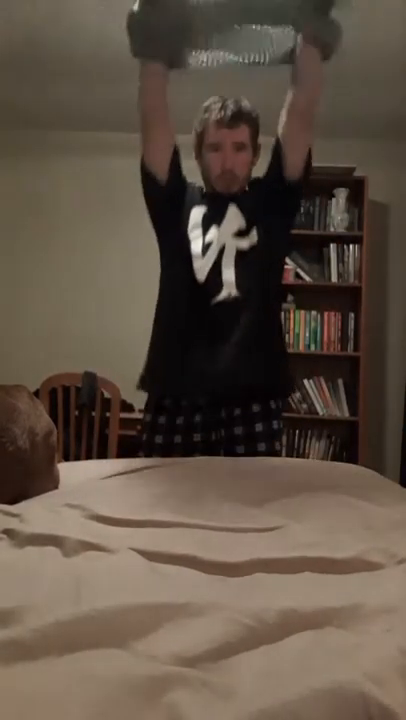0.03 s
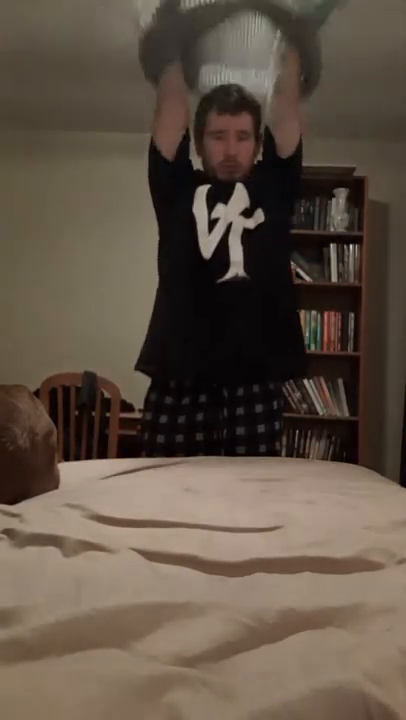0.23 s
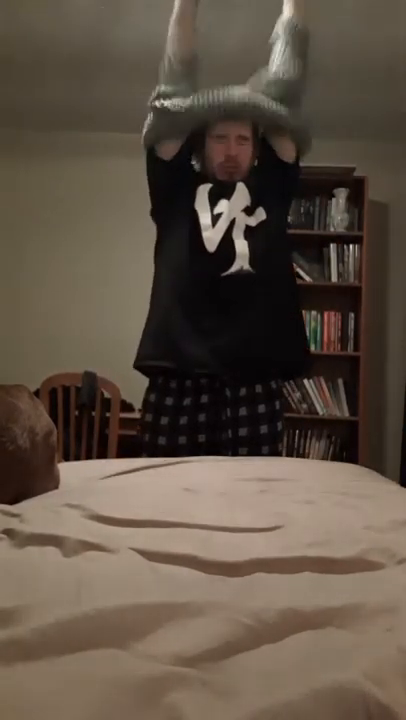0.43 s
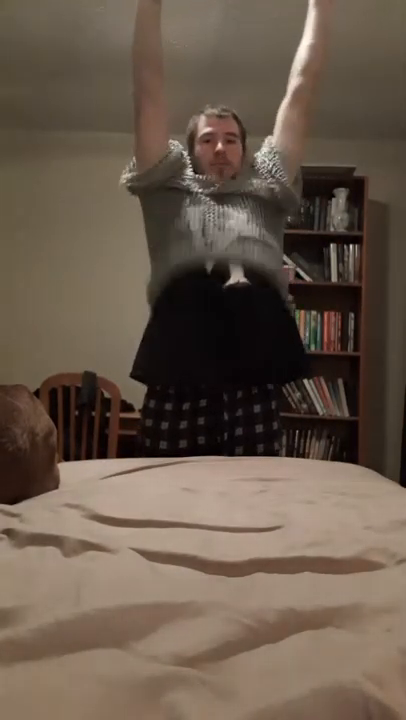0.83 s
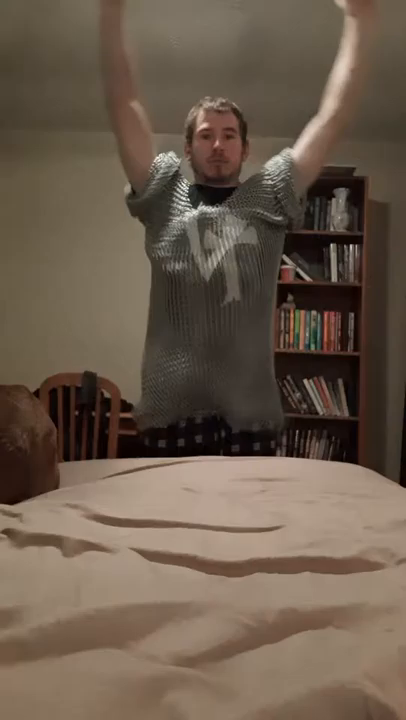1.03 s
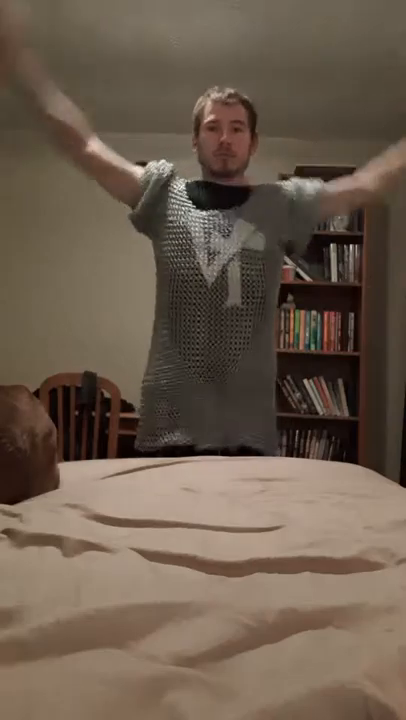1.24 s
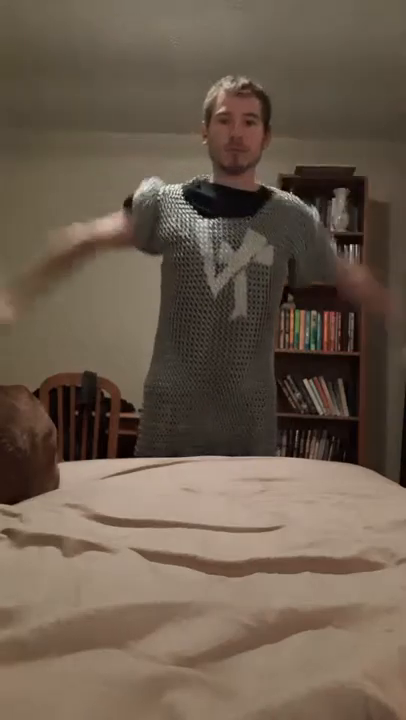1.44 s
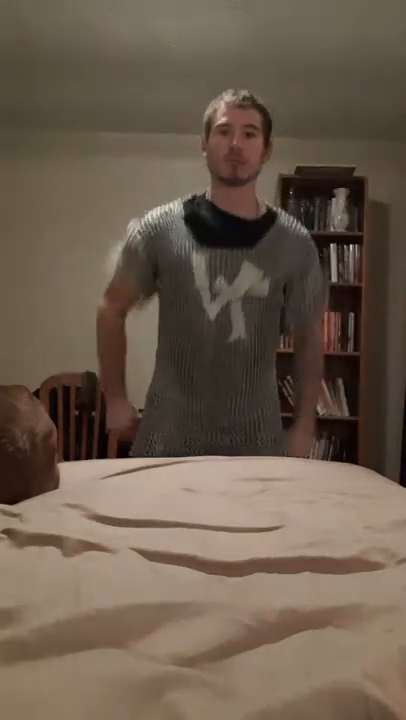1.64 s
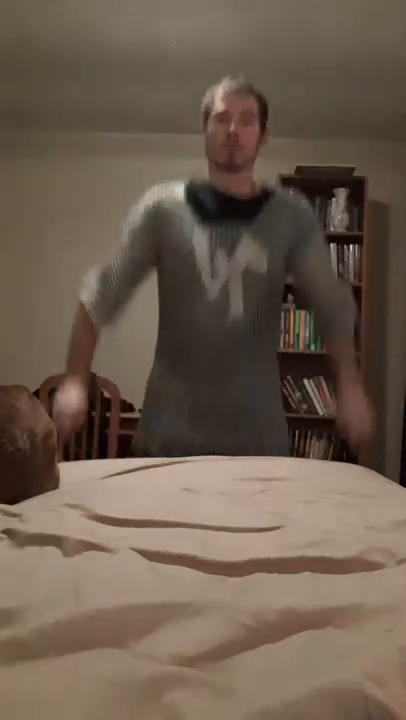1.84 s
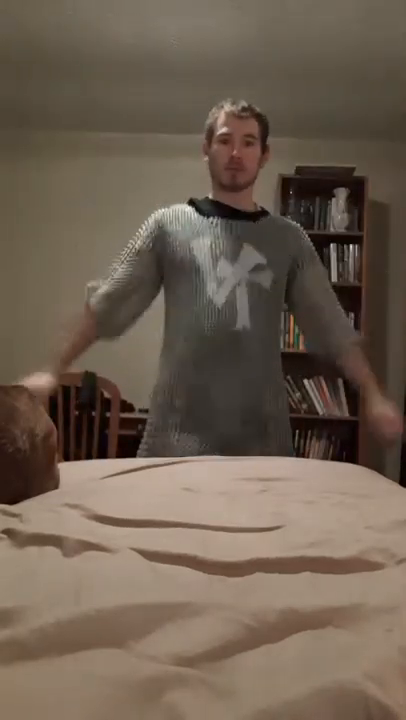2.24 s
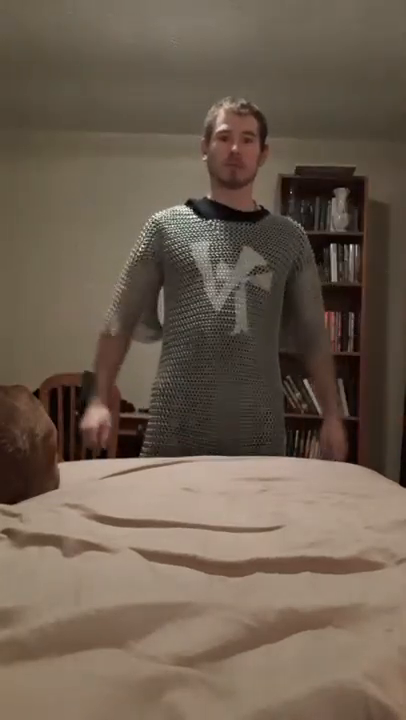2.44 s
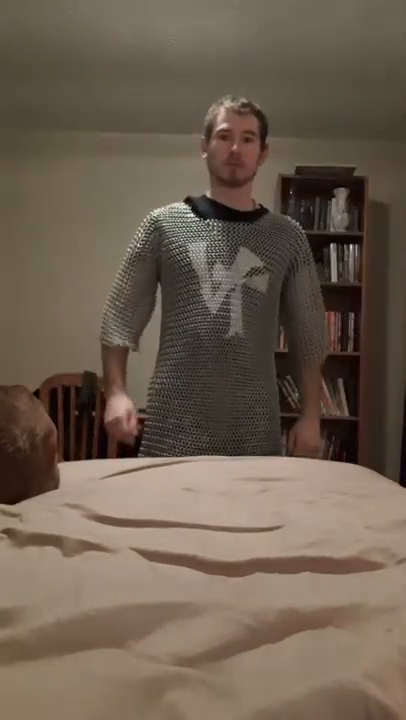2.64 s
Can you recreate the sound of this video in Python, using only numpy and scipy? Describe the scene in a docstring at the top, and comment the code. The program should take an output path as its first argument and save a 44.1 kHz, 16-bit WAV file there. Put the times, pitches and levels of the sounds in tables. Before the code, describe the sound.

Chainmail clicks and jingles, brighter on the left, as someone pulls it on in a bedroom. After a short lull and another rustle, one jump lands with a low thud and a metallic crunch, over a steady fan drone.

```python
"""A fan drones in the low modes of a bedroom while faint steel clicks swell into a jingle:
a chainmail shirt slides down over raised arms, swings, and is settled with one jump.
Thousands of small links click, scrape and ring; the mail drags over a cotton shirt
and slaps down as the feet land. The right microphone port is shaded from the treble."""
import sys
import numpy as np
from scipy import signal
from scipy.fft import rfft, irfft, next_fast_len
from scipy.io import wavfile
from scipy.ndimage import map_coordinates

SR = 44100
rng = np.random.default_rng(int(sys.argv[2]) if len(sys.argv) > 2 else 0)


def store_wav(level_fs):
    """Save 16-bit WAV to argv[1]."""
    pcm = np.round(np.clip(np.atleast_2d(level_fs), -1, 1) * 32767)
    wavfile.write(sys.argv[1], SR, pcm.T.astype(np.int16))


N = 119070


def amp(db):
    return 10 ** (np.asarray(db) / 20)


def unit_rms(x):
    return x / np.sqrt(np.mean(x ** 2) + 1e-20)


def at_hz(points, hz):
    """Read (f/Hz, value) breakpoints on a log frequency axis."""
    freqs, values = np.transpose(points)
    return np.interp(np.log(hz + 1), np.log(freqs + 1), values)


def clock():
    return np.arange(N) / SR


def envelope(points):
    """Join (t/s, value) breakpoints, one value a sample."""
    return np.interp(clock(), *np.transpose(points))


def wobble(knots_per_s):
    """Smooth random modulation."""
    return map_coordinates(rng.standard_normal(1024), [clock() * knots_per_s], mode="wrap")


def filtered(x, response):
    """Apply the gain response(hz) to x."""
    size = next_fast_len(N + 8192)
    return irfft(rfft(x, size) * response(np.fft.rfftfreq(size, 1 / SR)), size)[..., :N]


def coloured(x, eq):
    """Shape x with an EQ curve and bring it to rms 1."""
    return unit_rms(filtered(x, lambda hz: amp(at_hz(eq, hz))))


def contacts(per_s, spread_db):
    """A crackle of uneven impulses whose power stays steady at any density."""
    chance = np.clip(per_s / SR, 1e-4, 1)
    sizes = amp(spread_db * np.clip(rng.standard_normal(N), -2, 2)) * rng.choice([-1, 1], N)
    return unit_rms((rng.random(N) < chance) * sizes / np.sqrt(chance))


def ring(t, hz, t60):
    """A damped sine, for t >= 0."""
    return np.sin(2 * np.pi * hz * t) * np.exp(-np.log(1000) * t / t60)


def knock(start, db, hz, t60, attack_s):
    """One struck mode with a softened attack."""
    age = np.maximum(clock() - start, 0)
    return amp(db) * ring(age, hz, t60) * (1 - np.exp(-age / attack_s))


# EQ of the rushing air: f/Hz, level/dB
AIR_EQ = [(25, -40), (60, -27), (90, -15.5), (125, -8.5), (165, -7.5), (187, -12.5), (215, -5.5), (255, -7),
          (290, -2.5), (320, -4), (360, -0.5), (480, -3.5), (650, -13.5), (1000, -19), (2000, -24),
          (4000, -26.5), (16000, -34)]
# stereo image of the air, narrow lows and wide highs: f/Hz, coherence of the two ports
AIR_COHERENCE = [(60, .92), (150, 0.92), (350, 0.84), (650, 0.64), (1400, 0.022), (4000, 0)]
# room modes fed by the fan: f/Hz, half-width/Hz, level/dB
ROOM_MODES = [(116.6, 8.4, -59.5), (153.5, 7.7, -54), (280, 11.8, -57), (361.6, 19, -56.5)]
def fan(air_db=-47):
    """A steady low rush of air, with narrow room modes droning in it."""
    def mid_side_gains(hz):
        angle = np.arccos(at_hz(AIR_COHERENCE, hz)) / 2
        return np.array([np.cos(angle), np.sin(angle)])
    air = coloured(rng.standard_normal((2, N)), AIR_EQ)
    mid, side = filtered(air, mid_side_gains)
    drone = np.zeros(N)
    for centre, width, db in ROOM_MODES:
        mode = filtered(rng.standard_normal(N), lambda hz: 1 / (1 + ((hz - centre) / width) ** 2))
        drone += amp(db) * unit_rms(mode)
    return amp(air_db) * np.array([mid + side, mid - side]) + drone


# movement of the mail, driving click density and loudness: t/s, level/dB
MAIL_MOTION = [(0.01, -51.5), (0.06, -64.5), (0.15, -53.5), (0.43, -29.5), (0.56, -38), (0.82, -36.5),
               (0.92, -41), (0.95, -38), (1.1, -41.5), (1.33, -60.5), (1.37, -54.5), (1.41, -56),
               (1.76, -39.5), (1.82, -40), (1.88, -50), (2.1, -50.5), (2.17, -43.5), (2.2, -34),
               (2.25, -31.5), (2.29, -40.5), (2.45, -54.5), (2.65, -49), (2.69, -56.5)]
# bright EQ of steel scraping steel: f/Hz, level/dB
SCRAPE_EQ = [(400, -38), (1500, -22), (3000, -25.5), (4100, -4.5), (5000, -9.5), (6800, -5), (7700, -8.5),
             (9000, -7), (9900, -3), (11200, -7), (12800, -1.5), (14000, -0.5), (15800, -2)]
# modes of one link: f/Hz, relative level/dB, detune between links/fraction, t60/s
LINK_MODES = [(4133, -9.5, 0.0296, 0.048), (6760, -3, .05, 0.052), (9020, -4, 0.0168, 0.076),
              (14000, 0, 0.023, 0.06), (15200, 2, .03, 0.05)]
def links(count=40, full_motion_db=-36, full_clicks_per_s=9000, scrape_db=-35.5, jingle_db=-41):
    """Links collide: each contact is a dry click and rings one of many slightly detuned links."""
    flutter_db = 1.09 * wobble(knots_per_s=45)
    motion_db = envelope(MAIL_MOTION) - full_motion_db + flutter_db
    # More movement packs the clicks closer and lifts the scrape faster than the ring.
    hits = contacts(per_s=full_clicks_per_s * amp(0.5 * motion_db), spread_db=4)
    scrape = coloured(hits, SCRAPE_EQ) * amp(scrape_db + 1.06 * motion_db)
    blows = hits * amp(jingle_db + 0.8 * motion_db)
    struck_link = rng.integers(count, size=N)
    t = np.arange(4096) / SR
    jingle = np.zeros(N)
    for link, detunes in enumerate(rng.standard_normal((count, len(LINK_MODES)))):
        ping = sum(amp(db) * ring(t, hz * (1 + spread * detune), t60)
                   for (hz, db, spread, t60), detune in zip(LINK_MODES, detunes))
        jingle += signal.oaconvolve(blows * (struck_link == link), ping / np.linalg.norm(ping))[:N]
    return scrape + jingle


# swells of mail sliding over cloth: t/s, level/dB before the trim
DRAG_SWELLS = [(0.01, -78), (0.15, -85), (0.37, -63), (0.42, -47.5), (0.59, -67), (0.65, -53),
               (0.91, -56.5), (0.96, -49), (1.12, -49), (1.31, -85), (1.79, -63), (2.07, -80), (2.11, -58),
               (2.15, -67)]
# EQ of the cotton rustle: f/Hz, level/dB
COTTON_EQ = [(200, -16), (700, -9), (1300, -11), (2200, -4.5), (3500, -4), (5500, 2), (8000, -19),
             (16000, -31)]
def drag(trim_db=1.5):
    """The weave catches and slips on the cotton shirt."""
    rustle = coloured(contacts(per_s=2500, spread_db=7), COTTON_EQ)
    return rustle * amp(envelope(DRAG_SWELLS) + trim_db)


# bright accents from single links: t/s, level/dB, f/Hz, t60/s
TINK_CUES = [(.259, -40.5, 4200, 0.052), (.368, -33, 4130, .05), (1.017, -32, 3570, 0.037)]
def tinks():
    """Single links snap free and ring briefly."""
    return sum(knock(*cue, attack_s=0.0015) for cue in TINK_CUES)


# the mail falls onto the body: peak t/s, level/dB, rise/s, t60/s
SLAP_CUES = [(.422, -58, .012, 0.14), (.648, -53, .008, .2), (.95, -45.5, 0.017, 0.22),
             (1.775, -52, .015, .18), (2.189, -36, 0.0078, 0.11), (2.2, -42, .004, 0.24)]
# EQ of the slap, with the top rolled off: f/Hz, level/dB
SLAP_EQ = [(150, 2), (500, 6), (1200, 3.5), (2000, 5.5), (4500, 3.5), (6500, 4), (8000, -11), (16000, -27)]
def slaps():
    """A sheet of links lands at once: a short, dull crunch."""
    bursts = np.zeros(N)
    for peak, db, rise, t60 in SLAP_CUES:
        age = clock() - peak
        bursts += amp(db) * np.exp(np.minimum(age / rise, -np.log(1000) * age / t60))
    return coloured(contacts(per_s=2700, spread_db=4.5), SLAP_EQ) * bursts


# low thuds that end the jump: t/s, level/dB, f/Hz, t60/s
THUD_CUES = [(2.196, -23.5, 217, 0.059), (2.203, -43, 52, 0.18), (2.218, -38, 154.5, 0.21),
             (2.252, -37, 85.5, 0.11), (2.295, -45, 52, .16)]
def landing():
    """Feet and heels meet the floor, each thud one low damped mode."""
    return sum(knock(*cue, attack_s=0.0032) for cue in THUD_CUES)


# reverb time of the bedroom: f/Hz, t60/s
ROOM_DECAY = [(100, 0.36), (1000, 0.31), (6000, 0.2), (16000, 0.2)]
def bedroom(x, wet_db=-1.5, port_lag_s=0.000355):
    """The direct sound reaches the left port first; each port hears its own short room tail."""
    hz, t, noise = signal.stft(rng.standard_normal((2, SR // 3)), SR, nperseg=256)
    decay = np.exp(-np.log(1000) * t / at_hz(ROOM_DECAY, hz)[:, None])
    _, tails = signal.istft(noise * decay, SR, nperseg=256)
    wet = signal.fftconvolve(x[None], tails / np.linalg.norm(tails[0]), axes=1)[:, :N]
    delayed = filtered(x, lambda f: np.exp(-2j * np.pi * f * port_lag_s))
    makeup = np.sqrt(2 / (1 + amp(wet_db) ** 2))
    return (np.array([x, delayed]) + amp(wet_db) * wet) * makeup


def scene():
    """The mail plays through the room reverb, over dry thuds and the bed of fan noise."""
    mail = links() + drag() + tinks() + slaps()
    return bedroom(mail) + landing() + fan()


# shading of the right port: f/Hz, level/dB of left over right
PORT_SHADE = [(100, 1), (200, 2), (380, 2), (700, 4), (1290, 9.5), (2400, 6.5), (4400, 8), (6300, 10.5),
              (7500, 31), (9000, 14), (10200, 13), (12500, 16), (14200, 23.5), (15800, 15)]
def record(dry, cutoff_hz=15900):
    """The shaded right port tips the treble to the left; a brick-wall low-pass cuts the top."""
    def port_gains(hz):
        right = amp(-at_hz(PORT_SHADE, hz))
        equal_power = np.sqrt(2 / (1 + right ** 2))
        return np.array([np.ones_like(hz), right]) * equal_power * (hz < cutoff_hz)
    return filtered(dry, port_gains)


dry = scene()
out = record(dry)
store_wav(out)
```